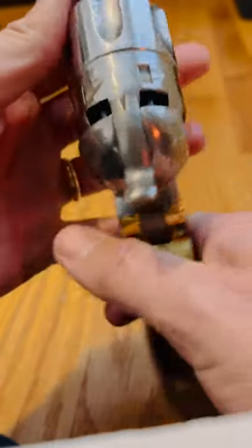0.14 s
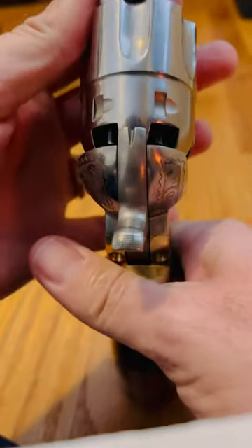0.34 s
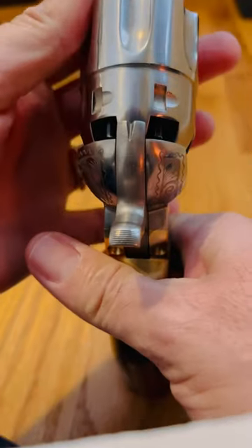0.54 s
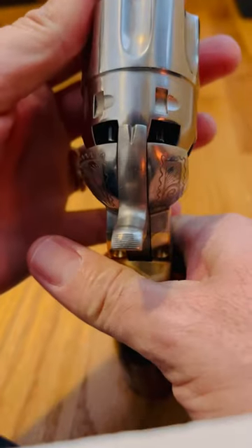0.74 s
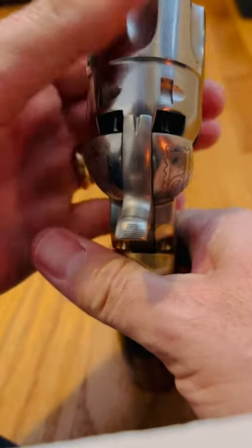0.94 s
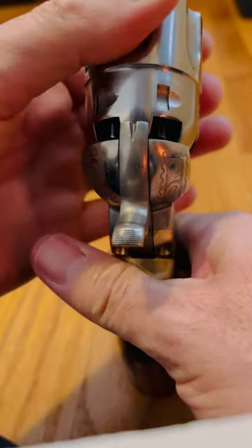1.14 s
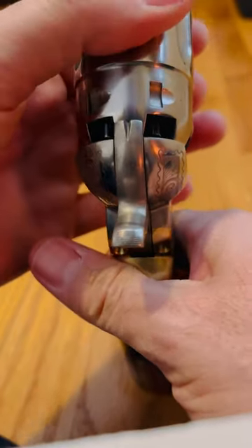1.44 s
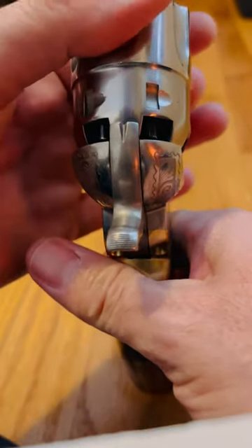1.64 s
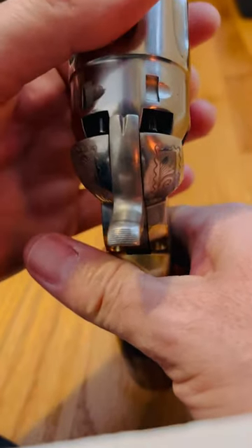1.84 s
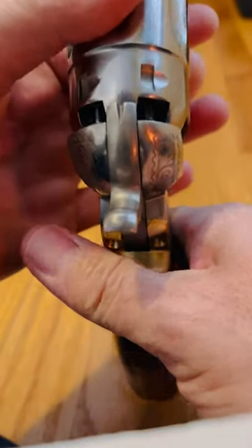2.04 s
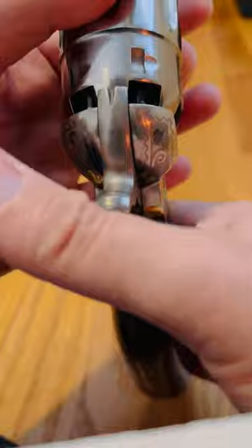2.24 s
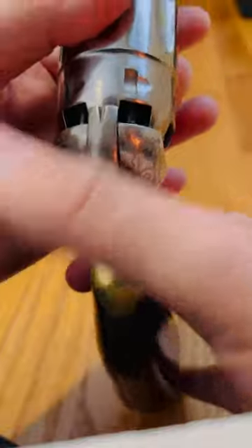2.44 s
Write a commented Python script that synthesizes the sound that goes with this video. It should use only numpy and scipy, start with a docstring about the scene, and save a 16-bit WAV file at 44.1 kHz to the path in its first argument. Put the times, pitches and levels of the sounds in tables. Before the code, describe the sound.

One loud, woody knock of a heavy steel revolver on a table, then faint metallic clicks

```python
"""Revolver knocking on a wooden table

In a small quiet room, filtered noise gives the air, and wavering sines give a low hum and a far fan.
Fingers slide on steel, as enveloped noise bands, and the cylinder gives a few faint clicks, each a sum
of decaying modes. The revolver, held over a wooden table, knocks against it once: a crack of noise,
the ringing modes of the table top, and noise that decays band by band as the room's reverberation.
"""
import sys
import numpy as np
from scipy import signal
from scipy.fft import rfft, irfft, next_fast_len
from scipy.io import wavfile
from scipy.ndimage import uniform_filter1d

SR = 44100
rng = np.random.default_rng(int(sys.argv[2]) if len(sys.argv) > 2 else 0)


def volts_from_db(level):
    """Convert decibel levels to linear amplitude ratios."""
    exponent = np.asarray(level, float) / 20
    return 10 ** exponent


def wav_out(sig):
    """Save sig, one row per channel (or a flat mono array), as 16-bit PCM at SR to the path in sys.argv[1]."""
    wavfile.write(sys.argv[1], SR, np.round(np.clip(np.atleast_2d(sig).T, -1, 1) * 32767).astype(np.int16))


N = 114660  # length [samples]


def evened(x):
    """Normalizes the mean power, so that the rms is 1."""
    return x / np.sqrt(np.mean(x ** 2) + 1e-20)


def read(points, hz):
    """Interpolates a spectrum linearly over log frequency."""
    f, value = np.transpose(points)
    return np.interp(np.log(hz + 1), np.log(f + 1), value)


def add(mix, s, sound):
    """Superposes a sound on the mix, starting at s seconds."""
    part = mix[..., round(s * SR):][..., :sound.shape[-1]]
    part += sound[..., :part.shape[-1]]


def slow(hz):
    """Random fluctuation of rms 1: white noise low-passed near hz by two moving averages."""
    smooth = uniform_filter1d(rng.standard_normal(N), int(SR / hz))
    return evened(uniform_filter1d(smooth, int(SR / hz / 2)))


def noise(colour, patchy_db, size=512, spread=1):
    """Partly coherent stereo noise of rms 1: random spectra, shaped by a colour with drifting patches."""
    # left-right likeness: (frequency [Hz], correlation before the power of spread [0..1])
    likeness = [(60, 1), (150, 0.71), (300, 0.48), (700, 0.12), (1700, 0.14), (2700, 0.98), (4000, 0.23),
                (6000, .93), (12000, 0.56)]
    hz = np.fft.rfftfreq(size, 1 / SR)
    frame_count = N * 4 // size + 5
    a, b, c, d, patch = rng.standard_normal((frame_count, len(hz), 5)).T
    patch = uniform_filter1d(patch, 8, axis=0)  # over frequency
    patch = evened(uniform_filter1d(patch, 12, axis=1))  # over time
    same = np.clip(read(likeness, hz), 0, 1)[:, None] ** spread
    left = a + 1j * b
    right = same * left + np.sqrt(1 - same ** 2) * (c + 1j * d)
    spectra = np.array([left, right]) * volts_from_db(read(colour, hz)[:, None] + patchy_db * patch)
    return evened(signal.istft(spectra, nperseg=size, noverlap=size * 3 // 4)[1][:, :N])


def air():
    """Broadband room air: stationary coloured noise under a slow random level modulation."""
    # colour of the air: (frequency [Hz], relative density [dB per Hz])
    air_colour = [(25, -35.5), (45, -13), (60, -9), (80, -9.5), (100, -12), (140, -14), (200, -21.5),
                  (270, -20.5), (350, -24.5), (450, -38), (600, -34.5), (900, -40.5), (1400, -39),
                  (2000, -43), (3000, -46), (4500, -47), (6000, -49), (9000, -55), (11500, -54),
                  (13000, -53.5), (14300, -67), (16000, -77.5)]
    level_db = -67.5 + 3.2 * slow(0.77)
    return volts_from_db(level_db) * noise(air_colour, patchy_db=3.0, size=2048)


def hum():
    """A low tone by frequency modulation: its phase is the integral of a wavering frequency."""
    # level of the hum: (time [s], rms level [dB])
    hum_level = [(0, -55.5), (.1, -61.5), (.2, -56), (.5, -59.5), (.62, -60.5), (.68, -75), (.76, -74),
                 (.86, -59), (1.05, -61), (1.2, -55.5), (1.33, -65), (1.42, -58.5), (1.56, -61.5),
                 (1.66, -65), (1.74, -80), (1.84, -60), (1.97, -59.5), (2.04, -61), (2.22, -56),
                 (2.3, -63.5), (2.46, -57.5), (2.54, -73), (2.6, -67)]
    t = np.arange(N) / SR
    hz = 58.8 * (1 + 0.037 * slow(2.0))
    tone = np.sin(2 * np.pi * np.cumsum(hz) / SR)
    return np.sqrt(2) * volts_from_db(np.interp(t, *np.transpose(hum_level))) * tone


def fan():
    """Periodic blade passage: a wavering blade tone, phase-locked to its octave below."""
    # the fan: (time [s], mean blade tone [Hz], its rms level [dB], rms level an octave below [dB])
    fan_course = [(0, 267.8, -72, -72.5), (.7, 270, -87, -72.5), (1.001, 268.1, -77, -74),
                  (1.079, 267.2, -72.5, -70), (1.249, 269.9, -82, -71), (1.359, 270.5, -71.5, -73.5),
                  (1.6, 273.4, -71, -71), (1.74, 275, -78.5, -84.5), (1.87, 277.4, -69, -80),
                  (2.0, 277.5, -78.5, -80), (2.18, 278.2, -71.5, -85), (2.28, 273, -84.5, -83),
                  (2.4, 287.4, -72.5, -86.5), (2.6, 273, -79, -80)]
    t = np.arange(N) / SR
    s, blade_hz, blade_db, octave_below_db = np.transpose(fan_course)
    hz = np.interp(t, s, blade_hz) * (1 + 0.014 * slow(25))
    phase = 2 * np.pi * np.cumsum(hz) / SR
    blade = volts_from_db(np.interp(t, s, blade_db)) * np.sin(phase)
    octave_below = volts_from_db(np.interp(t, s, octave_below_db)) * np.sin(phase / 2)
    return np.sqrt(2) * (blade + octave_below)


def hands():
    """Friction noise: skin hisses and scrapes on steel in short strokes, over a low rustle of the grip."""
    # fingers sliding on steel:
    # (start [s], rise [s], hold [s], decay t60 [s], hiss level [dB], duller scrape level [dB])
    slides = [(-.02, 0.0048, 0.046, 0.4, -69.5, -85), (0.125, 0.041, 0.035, 0.13, -77, -95.5),
              (0.81, 0.029, 0.007, 0.62, -86, -101), (0.919, 0.044, 0.039, 0.21, -68.5, -70.5),
              (1.303, 0.089, 0.04, 0.19, -70.5, -79.5), (2.264, 0.013, 0.02, 0.9, -85.5, -86),
              (2.322, 0.13, 0.061, 0.2, -93, -83.5), (2.515, 0.033, 0.055, .3, -90, -84)]
    # colours of hiss, scrape and rustle: (frequency [Hz], relative density [dB per Hz])
    hiss_colour = [(400, -4.5), (700, -11), (1000, -2.5), (1300, -6), (1600, -3.5), (2000, -0.05),
                   (2500, -5), (3000, -4), (3500, -6), (4500, -8), (5200, 0.5), (6000, -1.5), (7000, -7.5),
                   (9000, -7.5), (10300, -11.5), (11500, -11.5), (13000, -9.5), (14300, -13),
                   (15500, -19.5), (16500, -17.5)]
    scrape_colour = [(1000, -32.5), (1400, -8.5), (1650, -1.25), (2200, -2.5), (3000, -9), (4600, -8),
                     (6000, -35.5)]
    rustle_colour = [(180, -37), (300, -1.5), (372, -14), (660, -12.5), (741, -24.5), (1200, -26.5),
                     (1560, -56.5), (2640, -120)]
    # level of the low rustle: (time [s], rms level [dB])
    grip_level = [(0, -90), (.06, -68), (.12, -82.5), (.5, -87.5), (1.4, -89), (1.7, -88), (2.2, -80.5),
                  (2.32, -76.5), (2.46, -71), (2.53, -74), (2.6, -72)]
    t = np.arange(N) / SR
    hiss = noise(hiss_colour, patchy_db=2.8, spread=0.77)
    scrape = noise(scrape_colour, patchy_db=0.57, spread=.6)
    rustle = noise(rustle_colour, patchy_db=3.0, size=1024)
    out = volts_from_db(np.interp(t, *np.transpose(grip_level))) * rustle
    for start, rise, hold, t60, hiss_db, scrape_db in slides:
        swell = np.clip((t - start) / rise, 0, 1) ** 2
        decay = volts_from_db(-60 * np.maximum(t - start - rise - hold, 0) / t60)
        out += swell * decay * (volts_from_db(hiss_db) * hiss + volts_from_db(scrape_db) * scrape)
    return out


def clicks():
    """Modal excitation: each soft contact rings the steel's modes near its colour, with a faint room tail."""
    # contacts: (time [s], peak level without tail [dB], centre of colour [Hz], spread [octaves],
    # broad snap under the colour [dB], factor on the ring times [-])
    contacts = [(0.0119, -43.5, 6000, 1.57, -9, 1.83), (0.765, -54, 2290, 0.39, -30, 1.7),
                (0.786, -57, 1990, 0.48, -21, 0.54), (0.9126, -58, 4020, 1, -1, 0.65),
                (1.6029, -44.5, 1840, 0.54, -15.5, 1.4), (1.93, -60.5, 1650, 0.26, -26, 1),
                (1.9616, -50, 2200, 0.28, -12, 1.5), (2.009, -48, 6400, 0.61, -13, 0.68),
                (2.038, -61, 8000, 1, -4, 0.65), (2.2252, -45, 3020, 0.1, -10.5, 0.93)]
    # modes of the steel in the hand: (frequency [Hz], relative level [dB], t60 before the factor [s])
    steel_modes = [(1010, -1.5, 0.014), (1420, -2, 0.0092), (1900, -4.5, 0.01), (2130, -0.5, 0.0091),
                   (2510, -3, 0.0092), (2970, 0, 0.0077), (3880, -3, 0.011), (4840, -3.5, 0.012),
                   (5180, 3, 0.0058), (6430, 8.5, 0.007), (8460, 0.5, 0.0074), (9600, 1, 0.011),
                   (12260, 0, 0.01)]
    snap_top_hz = 5600  # the broad snap fades above this
    contact_cycles = 1.4  # onset time, in cycles of the centre of colour
    tail_db, tail_t60, tail_rise_s = -16, .14, .012
    t = np.arange(SR // 5) / SR
    out = np.zeros((2, N))
    hz, mode_db, t60 = np.transpose(steel_modes)[:, :, None]
    snap_shape = 1 / (1 + (hz / snap_top_hz) ** 14)
    tail_shape = volts_from_db(-60 * t / tail_t60) * np.minimum(t / tail_rise_s, 1)
    for s, db, centre_hz, octaves, snap_db, ring in contacts:
        detune, phase = rng.random((2, len(steel_modes), 1))
        colour = volts_from_db(-6 * (np.log2(hz / centre_hz) / octaves) ** 2) + volts_from_db(snap_db) * snap_shape
        decay = volts_from_db(mode_db - 60 * t / (t60 * ring))
        # each mode is mistuned by up to 2 percent; its phase is random over a full cycle
        modes = colour * decay * np.sin(2 * np.pi * (hz * (.98 + .04 * detune) * t + phase))
        onset = 1 - np.exp(-(t * centre_hz / contact_cycles) ** 2)
        click = modes.sum(axis=0) * onset
        tail = rng.standard_normal((2, len(t))) * tail_shape
        tail = tail / np.linalg.norm(tail[0])
        wet = signal.fftconvolve(click[None], tail, axes=1)[:, :len(t)]
        add(out, s, volts_from_db(db) * (click + volts_from_db(tail_db) * wet) / abs(click).max())
    return out


def table_ring(t):
    """Modal synthesis of the struck table top: decaying sines that swell up over their first cycles."""
    # modes of the table top: (frequency [Hz], relative level [dB], t60 [s])
    table_modes = [(93.93, -16, 0.44), (131.74, -9.5, .4), (170.95, -5.5, 0.36), (222.5, -19.5, 0.44),
                   (264.2, -3, 0.24), (295.7, 1, 0.16), (343.5, -5.5, 0.15), (382, -2.5, .21),
                   (438, -15, .2), (493, -16, 0.093), (552, -26.5, 0.074), (650, -27.5, 0.022),
                   (784, -11, 0.11), (846, -0.5, 0.044), (1020, -18, 0.022)]
    rise_cycles, peak_db = 2.2, -2.5
    ring = np.zeros(len(t))
    for k, (hz, db, t60) in enumerate(table_modes):
        swell = 1 - np.exp(-(t * hz / rise_cycles) ** 2)
        polarity = (-1) ** k  # neighbouring modes start in opposite directions
        ring += polarity * volts_from_db(db - 60 * t / t60) * swell * np.sin(2 * np.pi * hz * t)
    return volts_from_db(peak_db) * ring / abs(ring).max()


def contact_crack(t):
    """Impulsive broadband excitation at first contact: coloured noise with a fast exponential decay."""
    # colour of the first contact: (frequency [Hz], relative density [dB per Hz])
    crack_colour = [(400, -14), (800, -7), (1200, -9.5), (1600, -18), (2200, -14.5), (3000, -22.5),
                    (3500, -35), (4500, -33.5), (5200, -38), (6000, -50), (7000, -59.5), (9000, -53.5),
                    (12000, -54.5), (16000, -68.5)]
    start_db, t60, rise_s = -17, .012, 0.0014
    burst = noise(crack_colour, 0, size=256, spread=.25)[:, :len(t)]
    return burst * volts_from_db(start_db - 60 * t / t60) * np.minimum(t / rise_s, 1)


def room_wash(t):
    """Diffuse reverberation: coloured noise in which each band decays at its own rate."""
    # colour of the room's answer to the knock: (frequency [Hz], relative density [dB per Hz])
    wash_colour = [(40, -34), (70, -15), (100, 0.5), (170, -6), (210, -19.5), (280, -6), (390, -6.5),
                   (530, -17), (800, -21), (1200, -32.5), (2000, -43.5), (3000, -51), (3500, -60.5),
                   (5000, -68.5), (6000, -75), (8000, -82.5), (9500, -69.5), (10500, -80.5), (12500, -87),
                   (16000, -92.5)]
    # reverberation time of the room: (frequency [Hz], t60 [s])
    room_t60 = [(80, 0.38), (210, 0.34), (400, 0.29), (800, 0.28), (1500, 0.27), (3900, 0.29),
                (10000, 0.26)]
    start_db, rise_s = -15, 0.005
    steady = noise(wash_colour, patchy_db=-5.0, size=2048, spread=.5)[:, :len(t)]
    hz, at, bands = signal.stft(steady, SR, nperseg=512)
    decay = volts_from_db(-60 * at / read(room_t60, hz)[:, None])
    wash = signal.istft(bands * decay, SR, nperseg=512)[1][:, :len(t)]
    return wash * volts_from_db(start_db) * (1 - np.exp(-(t / rise_s) ** 2))


def knock():
    """Impact of steel on wood: superposes the contact's crack, the table's modes and the room's tail."""
    t = np.arange(SR) / SR
    out = np.zeros((2, N))
    add(out, .219, table_ring(t) + contact_crack(t) + room_wash(t))
    return out


def scene():
    """Linear superposition of the room's air and tones, the hands, the clicks and the knock."""
    return air() + hum() + fan() + hands() + clicks() + knock()


def ports(x):
    """Linear filtering: phase and level differences between two microphone ports, split evenly by FFT."""
    # phase between the ports: (frequency [Hz], lead of the left [rad])
    port_phase = [(0, 0), (300, .2), (520, .9), (690, 2.3), (1200, 3.6), (1550, 5.6), (1900, 6.4),
                  (2200, 7.4), (2600, 8.2), (3500, 8.2), (4100, 6.7), (6000, 9.42), (10300, 15.7),
                  (16000, 24)]
    # level between the ports: (frequency [Hz], left minus right [dB])
    port_level = [(100, -0.5), (450, -2), (650, 1.5), (900, -10.5), (1500, 4.5), (2500, -2), (5000, -0.5),
                  (9000, -0.12)]
    size = next_fast_len(N + 2048)
    hz = np.fft.rfftfreq(size, 1 / SR)
    half_phase = np.interp(hz, *np.transpose(port_phase)) / 2
    half_db = read(port_level, hz) / 2
    half = np.exp(1j * half_phase) * volts_from_db(half_db)
    return irfft(rfft(x, size) * np.array([half, 1 / half]), size)[:, :N]


def roll_off(x):
    """The treble ends steeply here."""
    return signal.sosfilt(signal.butter(12, 15750, fs=SR, output="sos"), x)


def record(dry):
    """A chain of two stages: the two microphone ports filter linearly, then the treble is cut off steeply near
    15.75 kHz."""
    mix = ports(dry)
    return roll_off(mix)


dry = scene()
out = record(dry)
wav_out(out)
```